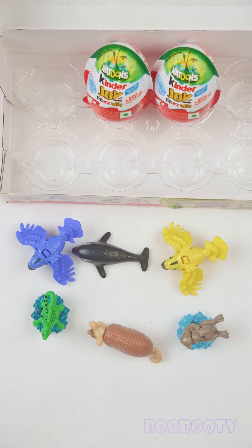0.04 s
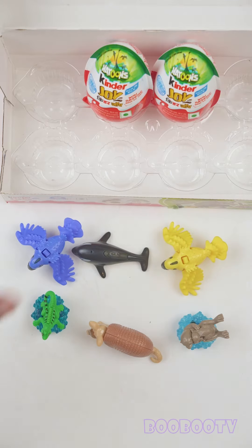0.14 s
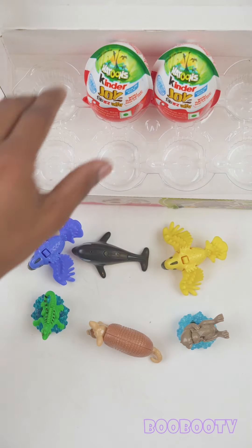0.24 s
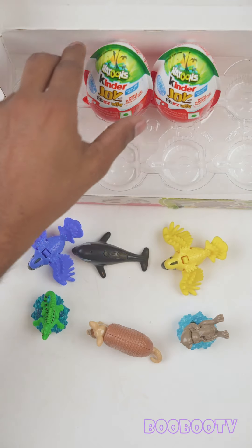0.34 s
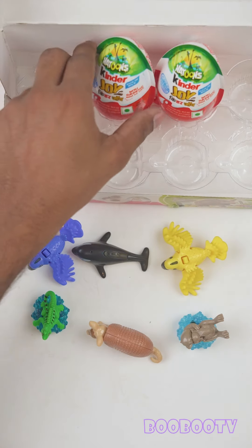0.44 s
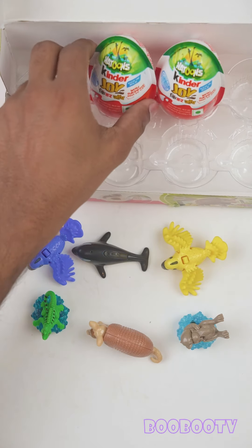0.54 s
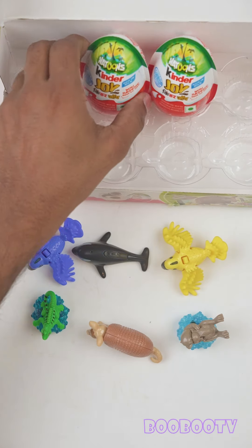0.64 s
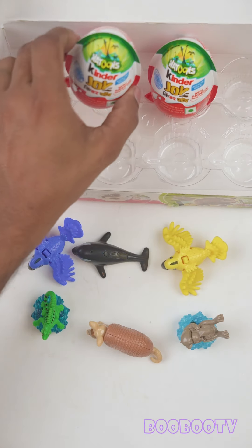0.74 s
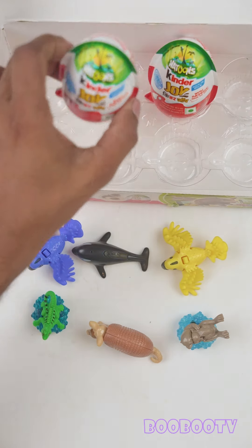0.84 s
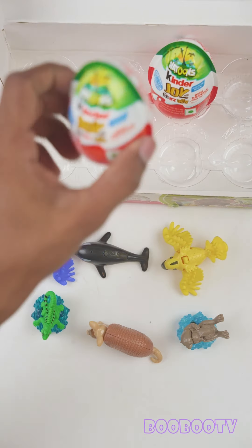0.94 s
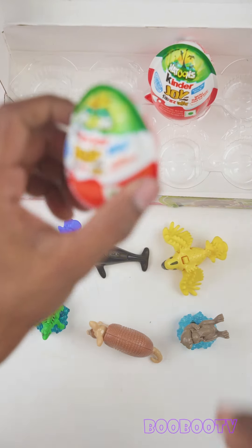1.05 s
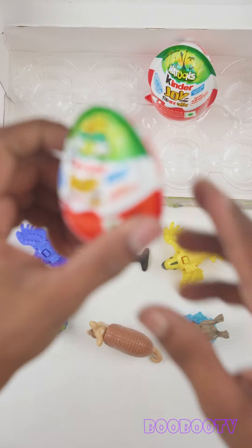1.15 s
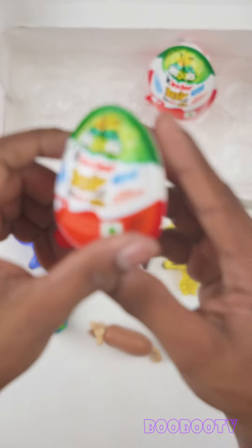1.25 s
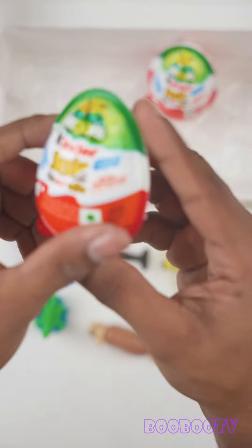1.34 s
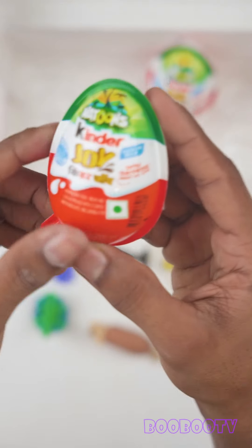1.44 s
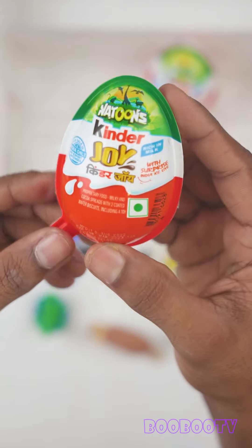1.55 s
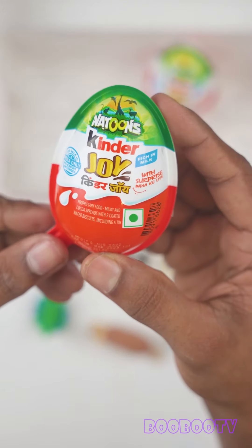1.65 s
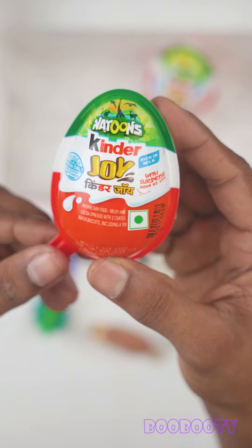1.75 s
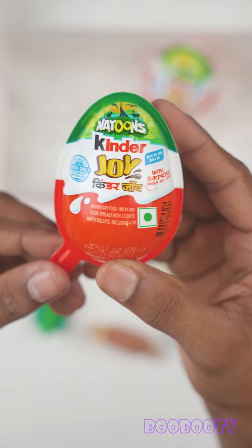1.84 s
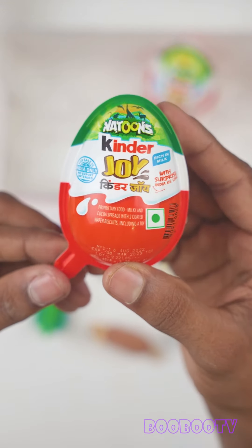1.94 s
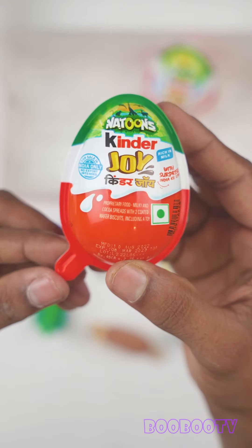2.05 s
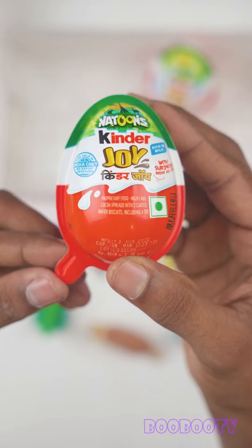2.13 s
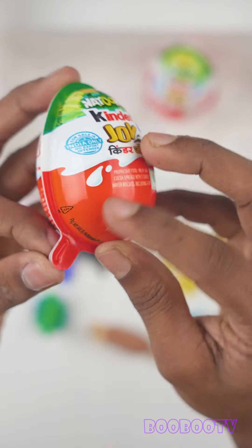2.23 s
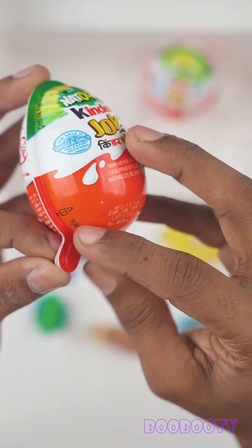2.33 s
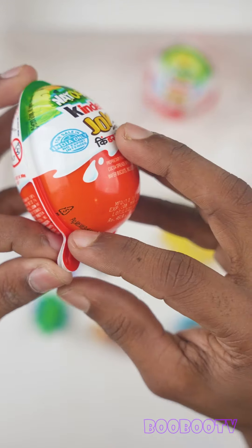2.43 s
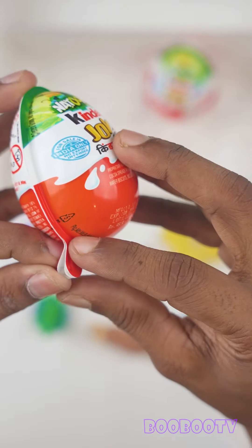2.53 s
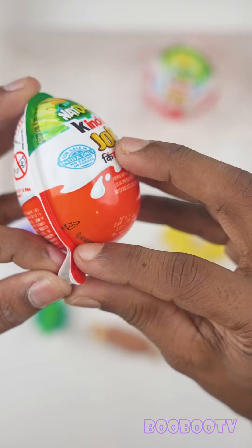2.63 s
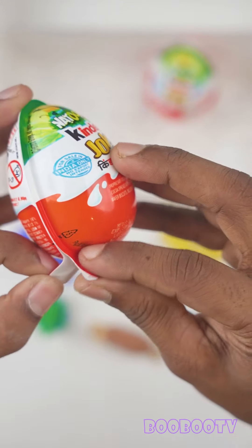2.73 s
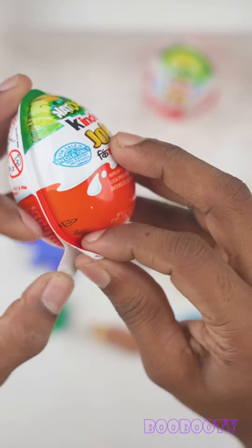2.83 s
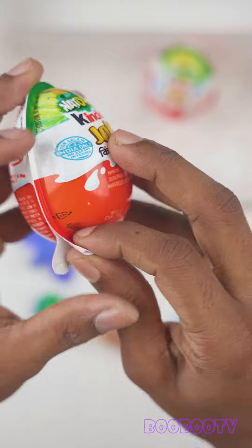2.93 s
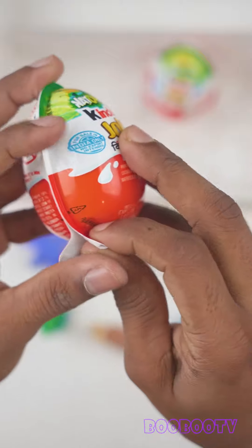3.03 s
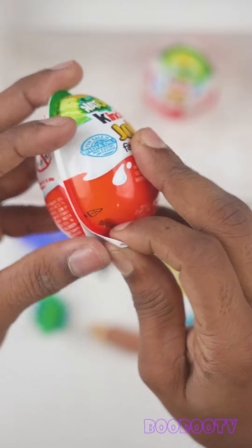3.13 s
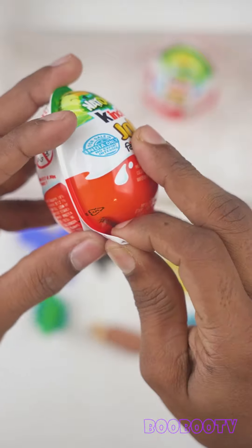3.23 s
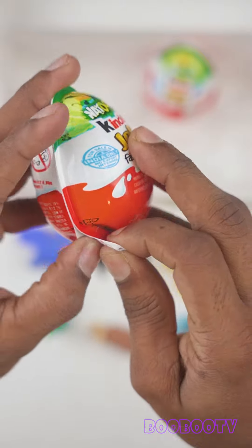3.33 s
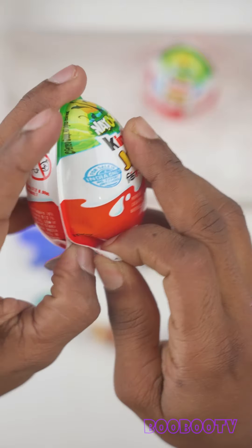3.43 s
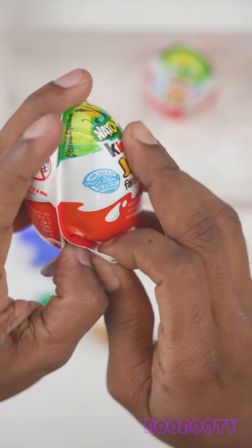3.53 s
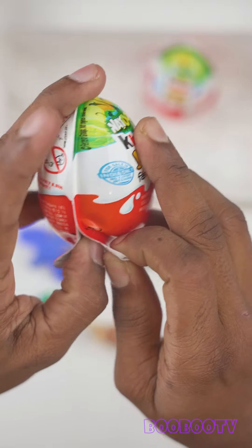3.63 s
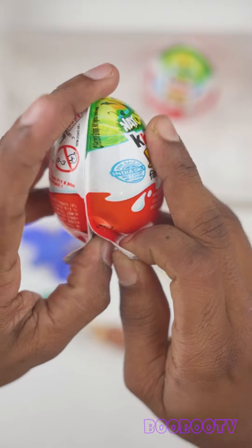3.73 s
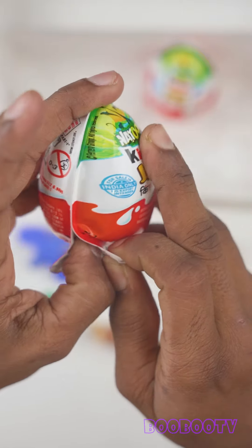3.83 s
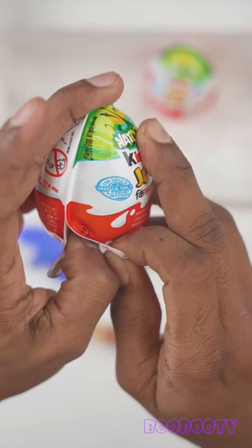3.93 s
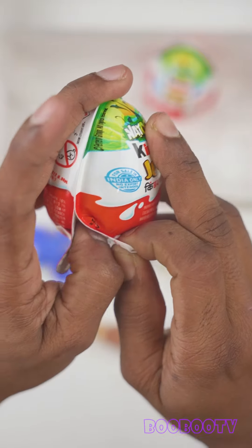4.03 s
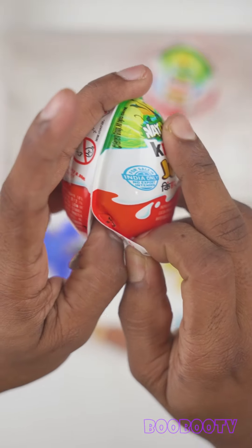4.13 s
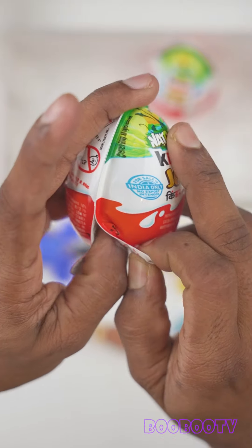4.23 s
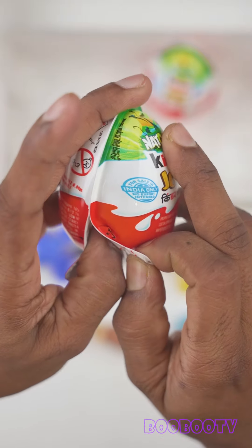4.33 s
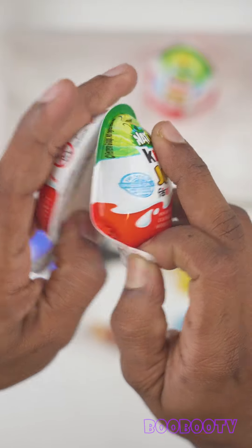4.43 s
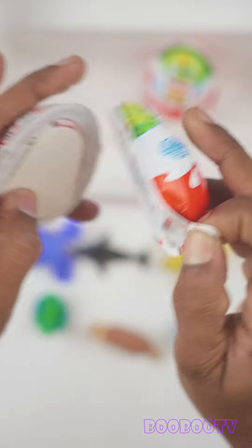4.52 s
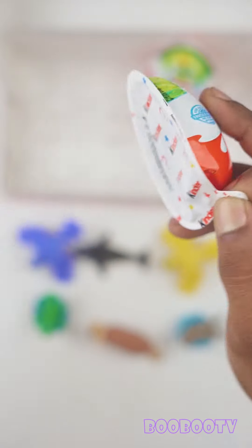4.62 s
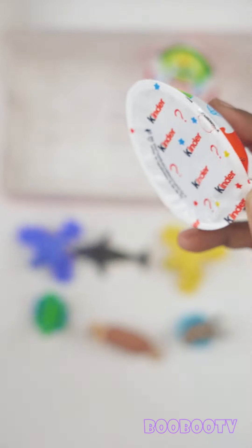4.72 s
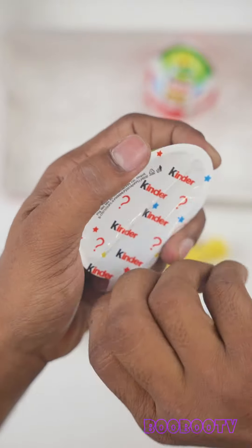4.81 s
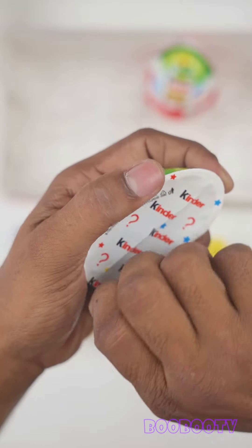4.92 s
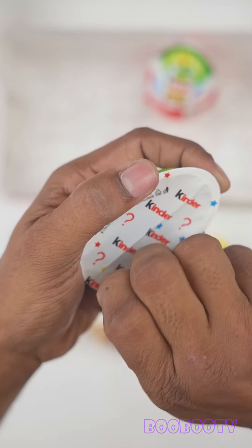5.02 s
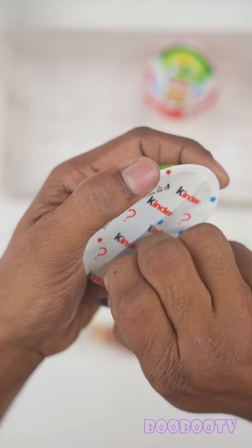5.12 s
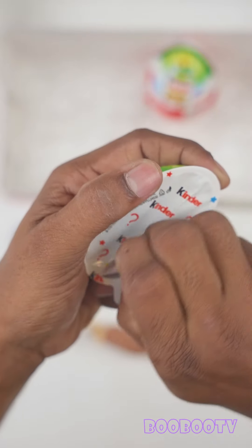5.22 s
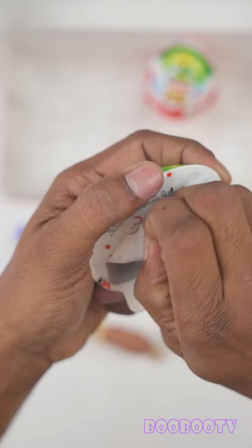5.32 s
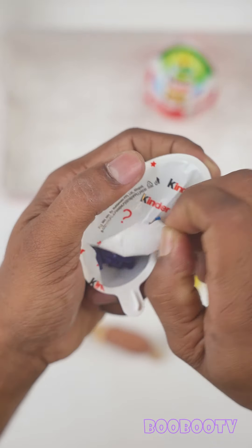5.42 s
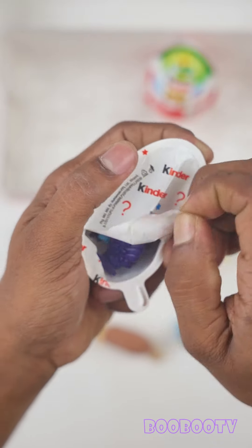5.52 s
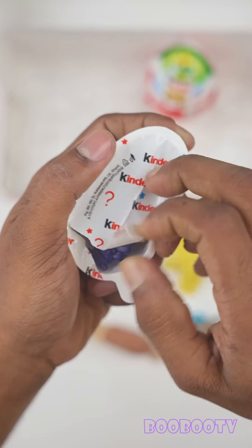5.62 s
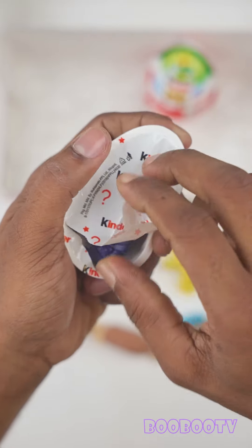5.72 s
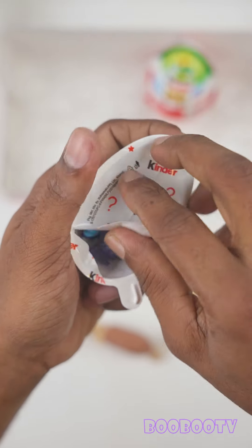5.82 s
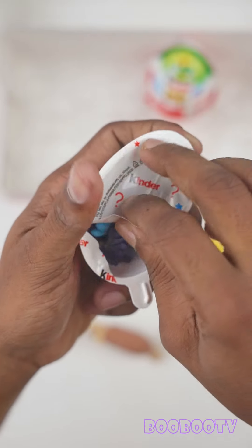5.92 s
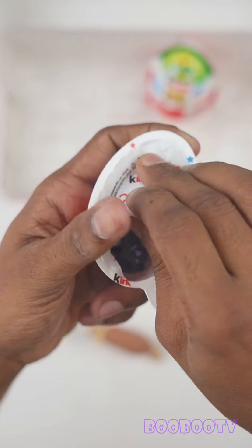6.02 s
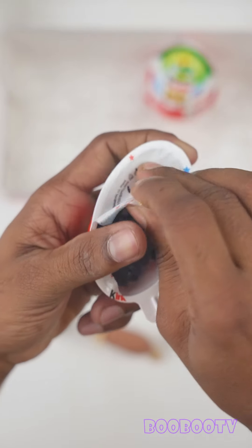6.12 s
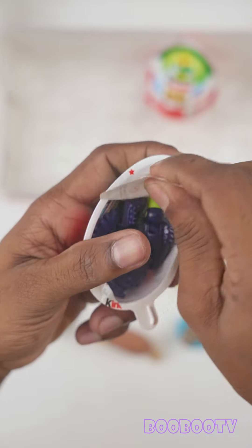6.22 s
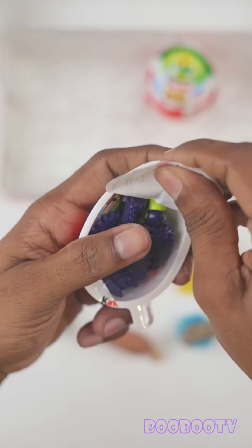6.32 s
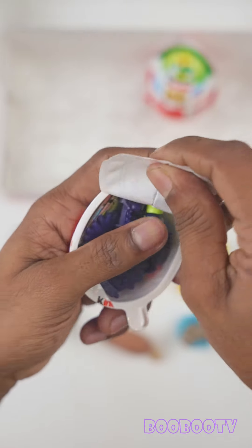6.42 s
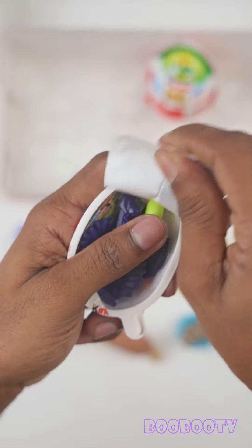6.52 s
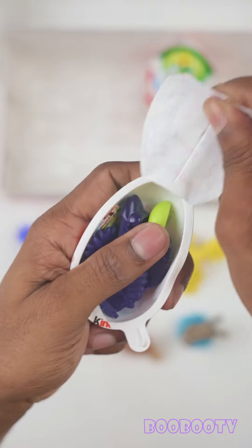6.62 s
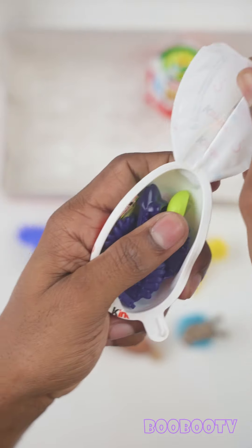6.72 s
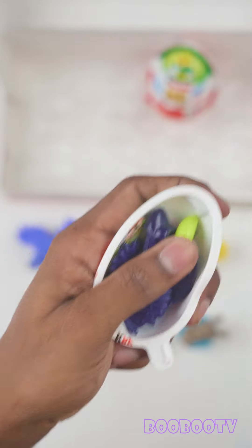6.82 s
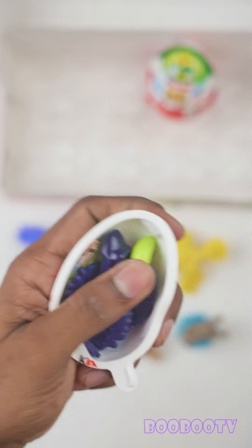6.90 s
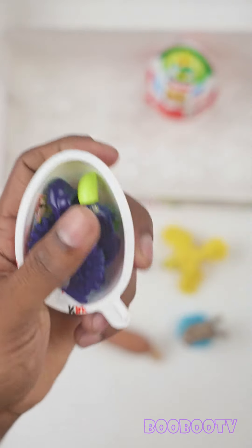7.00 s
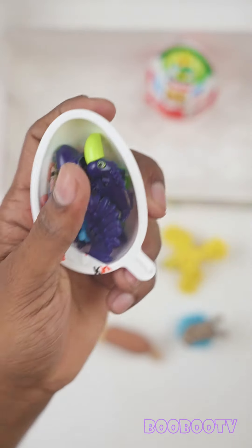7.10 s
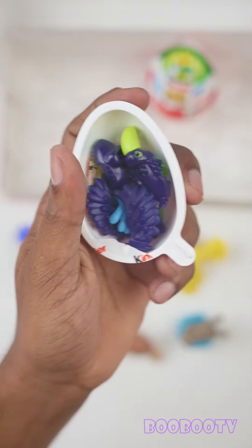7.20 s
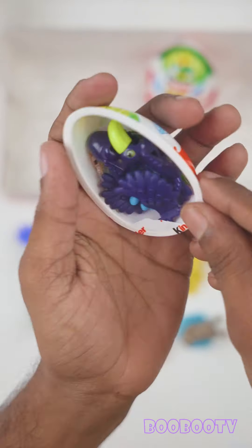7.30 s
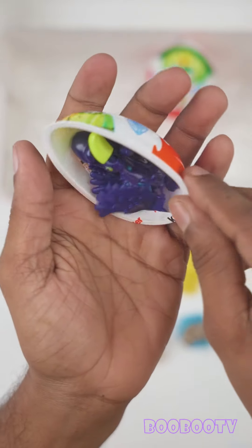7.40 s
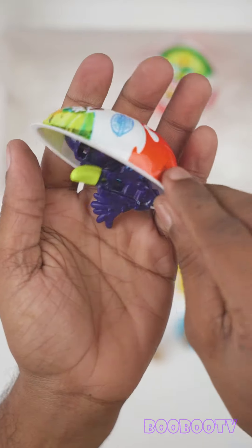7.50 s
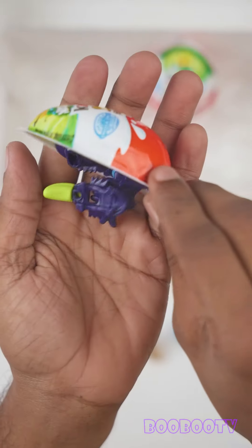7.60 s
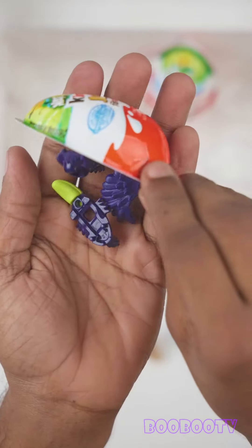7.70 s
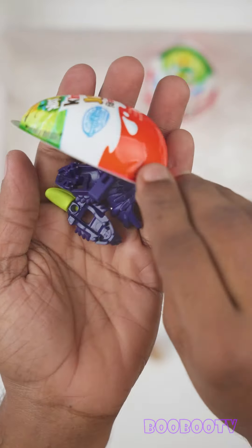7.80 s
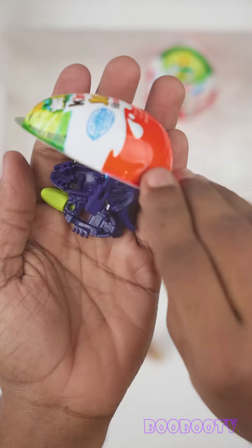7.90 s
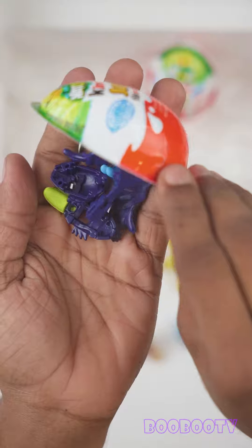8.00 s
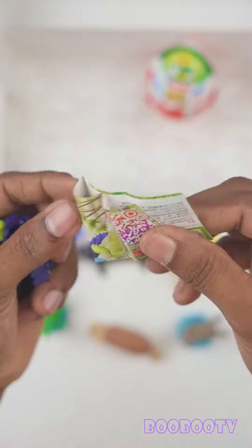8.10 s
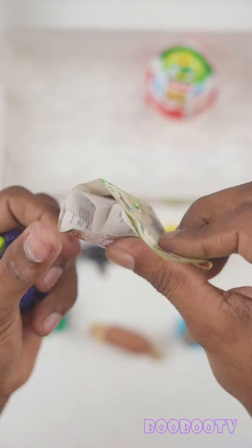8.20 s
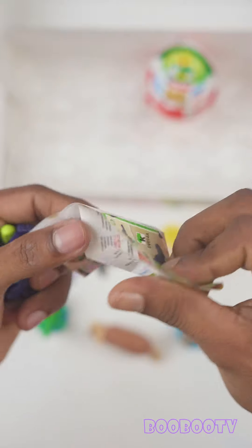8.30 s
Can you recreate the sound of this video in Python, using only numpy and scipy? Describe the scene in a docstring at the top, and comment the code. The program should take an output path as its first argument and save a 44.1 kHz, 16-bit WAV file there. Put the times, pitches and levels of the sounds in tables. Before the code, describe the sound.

Close plastic creaks and snaps build to a sharp pop, foil tears in bright bursts, then tiny hard toy pieces tick and rustle into a palm.

```python
"""A quiet furnished room hums, then fingers scrape a plastic egg close to a stereo microphone.
Hands turn the egg, pull its halves apart and peel a foil lid off one half: noise bursts snap like a giving seal
and ring a resonator, the hollow shell. Clumps of random clicks, filtered, make fingers and foil rub and rustle.
Small toy parts tick as damped sines, puffs of air thud as low swings with turbulence on top.
A decaying noise tail answers snaps and rubbing; filtered noise hums underneath."""
import sys
import numpy as np
from scipy import signal
from scipy.fft import rfft, irfft, next_fast_len
from scipy.io import wavfile

SR = 44100
rng = np.random.default_rng(int(sys.argv[2]) if len(sys.argv) > 2 else 0)


def wav_record(signal):
    """Record a signal, one row per channel, as 16-bit PCM in the file named by sys.argv[1]."""
    frames = np.transpose(np.atleast_2d(signal))
    bounded = np.clip(frames, -1, 1)
    # unit amplitude maps onto the largest positive 16-bit level
    quanta = np.round(bounded * 32767).astype(np.int16)
    wavfile.write(sys.argv[1], SR, quanta)


N = 368235
LEFT_RIGHT = np.array([[1], [-1]])   # opposite sign at the left and right port


def amp(db):
    """Decibels to gain."""
    return 10 ** (np.asarray(db) / 20)


def rms_one(x):
    """Scaled to unit rms."""
    return x / np.sqrt(np.mean(x ** 2) + 1e-20)


def at_hz(points, hz, axis=1):
    """One column of a table, read on a log-frequency axis."""
    points = np.array(points)
    return np.interp(np.log(hz), np.log(points[:, 0]), points[:, axis])


def band(x, low_hz, high_hz):
    """Band-pass with gentle slopes."""
    edges = [low_hz, min(high_hz, .45 * SR)]
    return signal.sosfilt(signal.butter(2, edges, "band", fs=SR, output="sos"), x)


def coloured(x, spectrum):
    """Filtered by a smooth spectrum; rms 1."""
    size = next_fast_len(N)
    hz = np.maximum(np.arange(size // 2 + 1) * SR / size, 1)
    return rms_one(irfft(rfft(x, size) * amp(at_hz(spectrum, hz)), size)[:N])


def drift(rate_hz):
    """Slow random wander of rms 1: noise through two equal low-pass poles."""
    r = np.exp(-2 * np.pi * rate_hz / SR)
    wander = signal.lfilter([1], [1, -2 * r, r * r], rng.standard_normal(N + SR))
    return rms_one(wander[SR:])   # skips the second in which the filter settles


def dying(t, t60_s):
    """Exponential decay, 60 dB down after t60_s."""
    return amp(-60 * t / t60_s)


def resonator_poles(hz, r):
    """Filter denominator of a ring at hz with pole radius r."""
    return [1, -2 * r * np.cos(2 * np.pi * hz / SR), r * r]


# the louder snaps of seal, foil and shell: start_s, hollow_peak_db, sizzle_peak_db
LOUD_SNAPS = [(0.9733, -40, -44), (2.3764, -37, -36.5), (2.5036, -41, -24), (2.5326, -31, -26.5),
              (2.5779, -24.5, -13.5), (2.7498, -35, -22), (2.7854, -34, -22), (2.8221, -24, -5),
              (3.2279, -40, -29), (3.4184, -15.5, -6), (3.45, -33, -25), (3.5138, -22.5, -14),
              (3.5192, -22.5, -54), (3.538, -32, -34), (3.606, -29, -28.5), (3.6233, -23.5, -40),
              (3.729, -19.5, -11.5), (3.7617, -29, -19.5), (3.8319, -23, -35.5), (3.893, -25, -29),
              (3.9082, -23, -22), (3.9176, -16.5, -14.5), (3.9579, -32.5, -23.5), (4.0522, -22.5, -41),
              (4.073, -21.5, -22), (4.128, -26.5, -36.5), (4.1545, -22, -17.5), (4.1876, -24, -23.5),
              (4.2071, -22, -27), (4.4262, -22.5, -19.5), (4.432, -21.5, -25), (4.4544, -22.5, -30.5),
              (4.4635, -17.5, -13.5), (4.474, -18.5, -17.5), (4.4874, -15, -7), (4.502, 1, -1.5),
              (4.5193, -6.5, -23), (4.53, -9.5, -3.5), (4.5376, -14, -9.5), (4.5441, -9.5, -6),
              (4.5522, -8.5, -14), (4.57, -6.5, 0), (4.5987, -16, -9.5), (4.7074, -19, -40),
              (4.7181, -10, -7), (4.9427, -15.5, -19.5), (5.056, -27, -66), (5.064, -56, -23),
              (5.1466, -18, -13), (5.2003, -43, -11.5), (5.2059, -17.5, -12.5), (5.266, -7, -46),
              (5.281, -22, -13), (5.295, -24, -14.5), (5.321, -11, -16), (5.3372, -17.5, -30),
              (5.3609, -20.5, -13.5), (5.4492, -23, -56), (5.482, -30, -30), (5.4971, -16, -27),
              (5.504, -17, -25.5), (5.548, -9, -18.5), (5.5552, -16, -32), (5.5623, -12, -9),
              (5.6383, -8, -33), (5.675, -16, -48), (5.7305, -44, -28), (5.7592, -19.5, -23.5),
              (5.8622, -26.5, -28.5), (5.8935, -23.5, -21), (5.8993, -24, -23), (5.949, -11, -18),
              (5.9792, -13, -11), (6.0042, -12.5, -24), (6.0269, -14, -33), (6.0572, -44, -27),
              (6.0671, -12.5, -44), (6.0765, -33, -19), (6.089, -14, -12), (6.2056, -13.5, -25.5),
              (6.2162, -19, -39), (6.225, -12, -47), (6.2365, -15, -10), (6.252, -5, -9.5),
              (6.3199, -21.5, -39.5), (6.593, -11.5, -9), (6.6288, -13.5, -11.5), (6.8566, -10, -6.5),
              (7.081, -24, -16), (7.2884, -32.5, -35), (7.7303, -19.5, -26.5), (7.8502, -25.5, -31),
              (7.8935, -31, -26), (8.0632, -21.5, -14.5)]
HOLLOW_SCATTER = 0.15   # log pitch spread: each snap starts at another spot of the seam
CRACK_SHARE, CRACK_DB, CRACK_SCATTER_DB = 0.64, -0.5, 3   # the crack lies between hollow and sizzle


def snaps():
    """Noise bursts of about a millisecond; returns the sound at both ports and the sound sent round the room."""
    size = 1200   # samples per snap
    t = np.arange(size) / SR
    close, around = np.zeros((2, N + size)), np.zeros(N + size)
    noise = rng.standard_normal((300, 4, size))   # at most 300 snaps sound
    click = np.tile(t == 0, (4, 1)) + 1e-18
    for (start_s, hollow_db, sizzle_db), chance in zip(list(LOUD_SNAPS) + small_snaps(), noise):
        # the last noise samples serve as this snap's random draws
        crack_db = hollow_db + CRACK_SHARE * (sizzle_db - hollow_db) + CRACK_DB
        crack_db += CRACK_SCATTER_DB * chance[1, -1]
        hollow_hz = hollow_at(start_s) * np.exp(HOLLOW_SCATTER * chance[0, -1])
        gains = amp([hollow_db, crack_db, sizzle_db])
        # the seal lets go, then the foil shivers
        kick = chance * (dying(t, 0.0037) + 0.16 * dying(t, 0.025))
        parts = snap_parts(kick, hollow_hz)
        aside = .5 * gains[2] * parts[3] * LEFT_RIGHT   # short waves differ between the ports
        at = round(start_s * SR)
        close[:, at:at + size] += gains @ parts[:3] + aside
        # peaks and dips average out over directions, so the room gets the smooth ring of a click
        around[at:at + size] += gains * [1, -1, 1] @ snap_parts(click, hollow_hz)[:3]
    return close[:, :N], around[:N]


def snap_parts(kick, hollow_hz):
    """Kicks shaped into the hollow ring, the crack, the sizzle and its side part, each of peak height 1."""
    r = np.exp(-np.pi * 700 / SR)   # air in the open half shell: 700 Hz bandwidth
    ring = signal.lfilter([1, 0, -1], resonator_poles(hollow_hz, r), kick[0])
    knock = band(kick[0], 380, 4500)   # the whole shell jumps
    hollow = ring / np.abs(ring).max() + 0.41 * knock / np.abs(knock).max()
    crack, sizzle = band(kick[1], 3800, 7420), band(kick[2], 6100, 12600)
    parts = np.array([hollow, crack, sizzle, band(kick[3], 5400, 12300)])
    return parts / np.abs(parts).max(axis=1, keepdims=True)


# hollow under the hands (tray, closed egg, gap between the halves, pocket under the foil): time_s, pitch_hz
HOLLOW_PITCH = [(0.75, 1100), (1.0, 2860), (3.1, 2600), (3.2, 1050), (3.38, 1050), (3.42, 2520),
                (3.52, 1400), (3.83, 2040), (4.43, 2280), (4.455, 1300), (4.5, 1600), (4.53, 1180),
                (4.72, 2460), (4.97, 2570), (5.06, 915), (5.27, 1290), (5.55, 1615), (5.76, 1370),
                (5.95, 1840), (6.25, 1750), (6.6, 2060), (7.9, 2350), (8.06, 1310)]


def hollow_at(s):
    """Pitch of the hollow in Hz at a moment, gliding between the table's points."""
    return np.interp(s, *np.transpose(HOLLOW_PITCH))


# strokes of skin, foil and toy parts over plastic: start_s, length_s, dull_scrape_db, bright_rustle_db
STROKES = [(0.464, 0.054, -46, -55.5), (0.495, 0.28, -61, -71), (0.676, 0.033, -78, -54.5),
           (0.713, 0.026, -58, -90), (0.9, 1.3, -82, -75), (0.988, 0.062, -75, -67),
           (1.049, 0.09, -65.5, -64), (1.313, 0.061, -67.5, -65), (1.422, 0.042, -83, -62.5),
           (2.277, 0.045, -72, -52), (2.37, 0.1, -59, -54), (2.951, 0.05, -59, -55), (3.061, 0.2, -62, -56),
           (3.182, 0.25, -62, -67.5), (4.008, 0.26, -58.5, -55.5), (4.3, 0.23, -66.5, -61),
           (4.445, 0.14, -45, -42), (4.493, 0.067, -32, -26), (4.962, 0.088, -59, -55),
           (5.271, 0.1, -44, -44.5), (5.478, 0.095, -45, -49), (5.822, 0.061, -50, -52),
           (5.936, 0.2, -46, -49.5), (6.143, 0.14, -44.5, -49.5), (6.416, 0.09, -54, -44.5),
           (6.602, 0.044, -42, -34), (7.278, 0.41, -55.5, -61), (7.474, 0.12, -49, -48),
           (7.68, 0.072, -55, -53), (7.77, 0.031, -50, -67), (7.832, 0.086, -49.5, -51),
           (7.973, 0.089, -59, -56.5), (8.053, 0.068, -72, -48), (8.16, 0.17, -71.5, -60.5)]
SMALL_PER_S = 24   # chance moments; only those inside a stroke count
SMALL_OVER_STROKE_DB, SMALL_SPREAD_DB, QUIETEST_DB = 18.5, 5, -42
TEARING_START_S, TEARING_END_S = 3.4, 7.0   # seal and foil come away between these moments


def small_snaps():
    """Random snaps during the strokes, their levels scattered a set step above scrape and rustle."""
    count = SMALL_PER_S * N // SR
    moments = rng.random(count) * N / SR
    scatter_db = SMALL_SPREAD_DB * rng.standard_normal((count, 2))
    rows = []
    for start_s, length_s, scrape_db, rustle_db in STROKES:
        for s, (hollow_step, sizzle_step) in zip(moments, scatter_db):
            hollow_db = scrape_db + SMALL_OVER_STROKE_DB + hollow_step
            sizzle_db = rustle_db + SMALL_OVER_STROKE_DB + sizzle_step
            in_stroke = start_s < s < start_s + length_s
            tearing = TEARING_START_S < s < TEARING_END_S
            if in_stroke and tearing and max(hollow_db, sizzle_db) > QUIETEST_DB:
                rows.append((s, hollow_db, sizzle_db))
    return rows


# tone of the bright rustle, relative: freq_hz, density_db (per Hz)
RUSTLE_TONE = [(900, -45.5), (1800, -18.5), (3000, -7), (8000, -2.5), (12000, -8.5), (16000, -20)]


def rubbing():
    """Slips ring the shell as a dull scrape and the film as a bright rustle with lone crackles, by strokes."""
    t, scraped, bright = np.arange(N) / SR, np.zeros(N), np.zeros(N)
    coarse = slips(per_s=2500, spread_db=2.5, clump_db=4.5)
    for start_s, length_s, scrape_db, rustle_db in STROKES:
        end_s = start_s + length_s
        span = slice(round(start_s * SR), round(end_s * SR))
        rise = (t[span] - start_s) / (0.22 * length_s)
        fall = (end_s - t[span]) / 0.01
        touch = np.clip(np.minimum(rise, fall), 0, 1)
        hz = hollow_at(start_s + length_s / 2)
        scrape = rms_one(band(coarse[span], hz / 2.22, hz * 1.89))
        scraped[span] += touch * amp(scrape_db) * scrape
        bright[span] += touch * amp(rustle_db)
    rustle = coloured(slips(per_s=10000, spread_db=4.5, clump_db=4.5), RUSTLE_TONE)
    aside = coloured(slips(per_s=10000, spread_db=4.5, clump_db=4.5), RUSTLE_TONE)
    # the brightness wanders with the pressure of the finger
    top = band(rustle, 14000, 20000)
    rustle = rustle + (amp(4.7 * drift(4.8)) - 1) * top
    crackle = amp(-5.5) * crackles(per_s=270, cycles=4.3)
    return scraped + bright * (rustle + crackle + 0.41 * aside * LEFT_RIGHT)


def slips(per_s, spread_db, clump_db):
    """Tiny stick-slip clicks of uneven size and random sign that come in clumps."""
    sizes = amp(spread_db * np.minimum(rng.exponential(1, N), 5)) * rng.choice([-1, 1], N)
    born = rng.random(N) < per_s / SR
    return sizes * born * amp(clump_db * drift(36)) + 1e-18


def crackles(per_s, cycles):
    """Lone creases pop, each ringing a few cycles at one of ten pitches; rms 1."""
    pops = slips(per_s, spread_db=10.0, clump_db=-3.5)
    dealt = rng.integers(0, 10, N)   # which pitch each pop gets
    out = 0
    for k, hz in enumerate(np.geomspace(1300, 11000, 10)):
        r = amp(-60 * hz / cycles / SR)   # 60 dB down after the given cycles
        own_pops = pops * (dealt == k) + 1e-18
        ring = [0, np.sin(2 * np.pi * hz / SR)]
        out = out + signal.lfilter(ring, resonator_poles(hz, r), own_pops)
    return rms_one(out)


# hard toy parts knock together and ring briefly: start_s, pitch_hz, level_db
KNOCKS = [(7.288, 3320, -33), (7.575, 5240, -28.5), (7.672, 5280, -27)]
# while the parts tumble out they also knock at random
TUMBLE_START_S, TUMBLE_END_S, TUMBLE_PER_S = 7.29, 8.11, 220
TUMBLE_LOW_HZ, TUMBLE_HIGH_HZ = 1800, 7000
TUMBLE_DB, TUMBLE_SPREAD_DB, TUMBLE_T60_S = -51, 3.5, 0.0052   # the quietest level, and the spread above it


def ticks():
    """Each knock of a hard part is one short damped sine."""
    t, out = np.arange(SR // 20) / SR, np.zeros(N)

    def knock(start_s, hz, level_db, t60_s):
        """Adds one damped ring."""
        at = round(start_s * SR)
        out[at:at + len(t)] += amp(level_db) * np.sin(2 * np.pi * hz * t) * dying(t, t60_s)

    for start_s, hz, level_db in KNOCKS:
        knock(start_s, hz, level_db, t60_s=0.016)
    length_s = TUMBLE_END_S - TUMBLE_START_S
    for when, pitch, size in rng.random((int(TUMBLE_PER_S * length_s), 3)):
        hz = TUMBLE_LOW_HZ * (TUMBLE_HIGH_HZ / TUMBLE_LOW_HZ) ** pitch
        level_db = TUMBLE_DB - TUMBLE_SPREAD_DB * np.log(size)
        knock(TUMBLE_START_S + when * length_s, hz, level_db, TUMBLE_T60_S)
    return out


# pushes of air on the microphone: start_s, level_db, pitch_hz, t60_s
PUFFS = [(0.476, -41.5, 45, 0.11), (3.515, -40, 35, 0.12), (4.51, -34, 60, 0.12), (4.598, -23.5, 25, 0.073),
         (5.27, -39, 45, 0.15), (6.21, -43, 59.95, 0.12), (6.689, -37.5, 55.3, 0.14),
         (6.857, -20.5, 32.1, 0.15), (7.57, -44, 54.7, 0.18), (7.843, -40, 34.7, 0.43),
         (8.216, -42, 60, 0.18)]


def thuds():
    """A puff swings the membranes slowly, with brief turbulence on top; the left port gets more."""
    t = np.arange(SR // 2) / SR
    out = np.zeros((2, N + len(t)))
    noise = rng.standard_normal((len(PUFFS), 2, len(t)))
    for (start_s, level_db, hz, t60_s), (mid, side) in zip(PUFFS, noise):
        turbulence = rms_one(band(mid + 0.42 * side * LEFT_RIGHT, 43, 270))
        # the turbulence fades faster than the swing
        swing = np.sin(2 * np.pi * hz * t) + 0.86 * turbulence * dying(t, 0.098)
        at = round(start_s * SR)
        out[:, at:at + len(t)] -= amp(level_db + 0.8 * LEFT_RIGHT) * swing * dying(t, t60_s)
    return out[:, :N]


# the diffuse tail by frequency, levels relative: freq_hz, level_db, t60_s
ROOM_TAIL = [(300, 2.5, 0.4), (1500, 0.5, 0.51), (5300, -3, 0.48), (10200, -3, 0.46), (15100, -4, 0.37)]
ROOM_DB, TABLE_DB, TABLE_T60_S = -11.5, -9.5, 0.021


def room(x):
    """Quick scatter from table and hands, then a diffuse noise tail that dies band by band."""
    t = np.arange(int(.8 * SR)) / SR
    near_left, near_right = rng.standard_normal((2, len(t)))
    tail = 0
    for low_hz in 150 * 2 ** np.arange(0, 6.6, .5):   # half-octave bands
        centre_hz = low_hz * 2 ** .25
        mid, side = rng.standard_normal((2, len(t)))   # unrelated noise in every band
        parts = band(mid + 0.41 * side * LEFT_RIGHT, low_hz, low_hz * np.sqrt(2))
        decay = dying(t, at_hz(ROOM_TAIL, centre_hz, axis=2))
        tail = tail + amp(at_hz(ROOM_TAIL, centre_hz)) * parts * decay
    tail = tail * np.clip(t / 0.0043, 0, 1)   # the first walls are metres away
    near = np.array([near_left + near_right * 0.35, near_left - near_right * 0.95])
    near = near * dying(t, TABLE_T60_S)

    def unit_energy(h):
        """Scaled to a mean energy of 1 per port."""
        return h / np.sqrt(np.sum(h ** 2) / 2)

    answer = amp(ROOM_DB) * unit_energy(tail) + amp(TABLE_DB) * unit_energy(near)
    return signal.fftconvolve(x[None], answer, axes=1)[:, :N]


# tone of the hum, relative: freq_hz, density_db (per Hz)
HUM_TONE = [(14, -4), (30, -8.5), (60, -20.5), (85, -19), (125, -14.5), (200, -23), (300, -27),
            (600, -30.5), (1000, -35.5), (1500, -45.5), (3000, -51), (8000, -51.5), (16000, -70.5)]
# how alike the hum is at the two ports: freq_hz, likeness (0 unrelated, 1 the same)
HUM_LIKENESS = [(30, 0.12), (150, 0.78), (5000, 0.33), (15000, 0.27)]
HUM_DB = -56   # rms over both ports


def hum():
    """Room tone and far traffic rumble: noise bands, each with its own likeness and slow swell."""
    out, white = 0, rng.standard_normal((2, 2, N + SR))
    for k, low_hz in enumerate(14 * 2 ** np.arange(0, 10.1, .5)):   # half-octave bands
        # neighbouring bands use different noise; the first second lets the filter settle
        mid, side = band(white[k % 2], low_hz, low_hz * np.sqrt(2))[:, SR:]
        centre_hz = low_hz * 2 ** .25
        alike = np.clip(at_hz(HUM_LIKENESS, centre_hz), 0, 1)
        both = np.sqrt(1 + alike) * mid + np.sqrt(1 - alike) * side * LEFT_RIGHT
        swell_db = 0.96 * drift(3.5)
        out = out + amp(at_hz(HUM_TONE, centre_hz) + swell_db) * both
    return amp(HUM_DB) * rms_one(out)


def scene():
    """Close sources, the room's answer to snaps and rubbing, air thuds and the hum."""
    close, around = snaps()
    rubbed = rubbing()
    answered = room(around + amp(1) * rubbed.mean(axis=0))   # rubbing goes in 1 dB up
    return close + rubbed + ticks() + answered + thuds() + hum()


CUTOFF_HZ = 16500   # 45 dB down from here up


def record(dry):
    """The loudest peaks stop at full scale, then a steep low-pass cuts the top."""
    low_pass = signal.cheby2(12, 45, CUTOFF_HZ, fs=SR, output="sos")
    return signal.sosfilt(low_pass, np.clip(dry, -1, 1))


dry = scene()
out = record(dry)
wav_record(out)
```